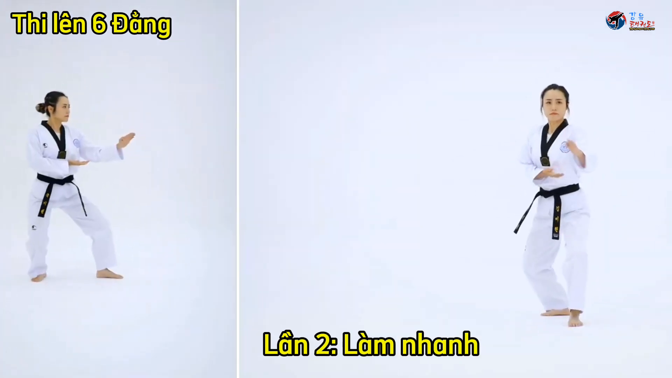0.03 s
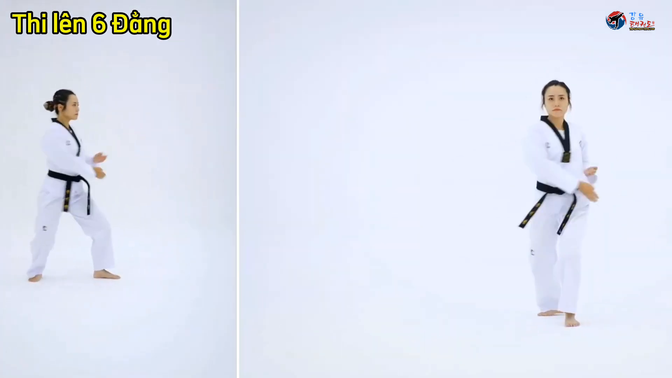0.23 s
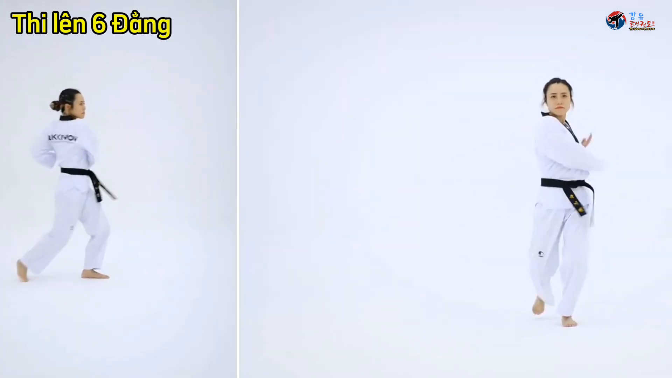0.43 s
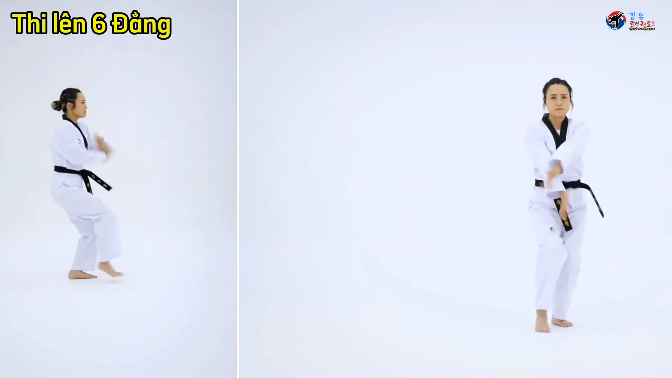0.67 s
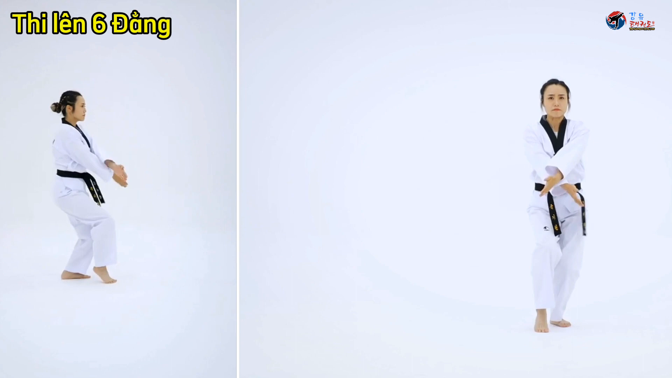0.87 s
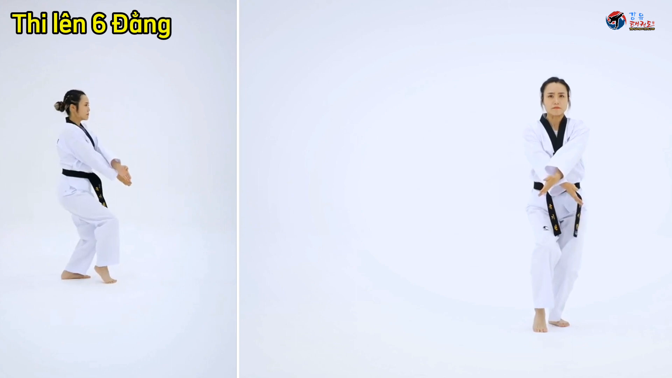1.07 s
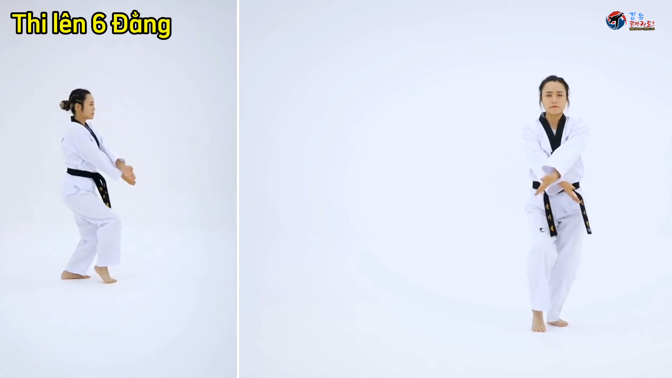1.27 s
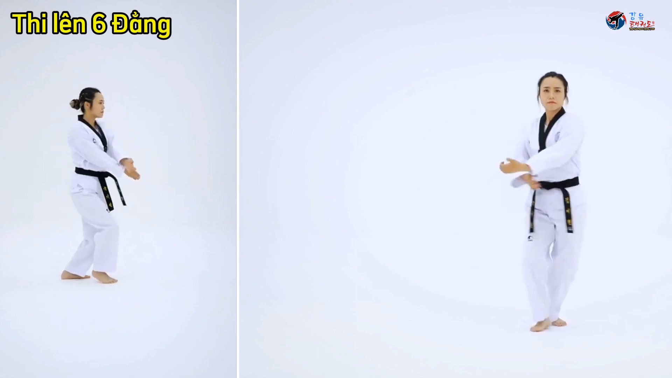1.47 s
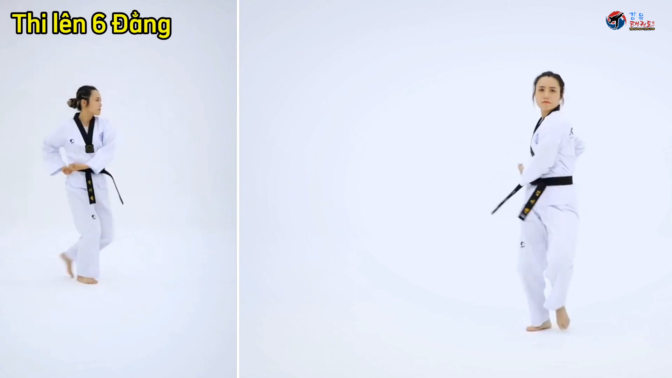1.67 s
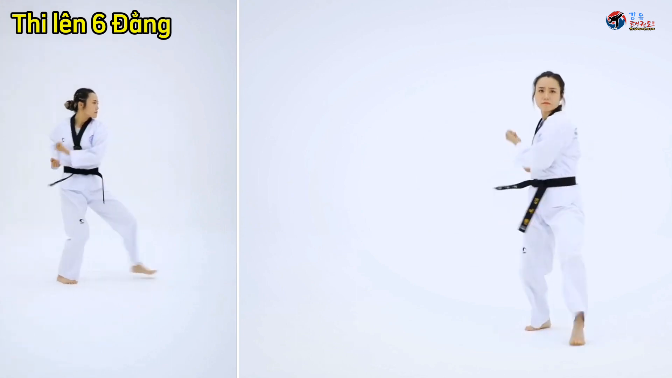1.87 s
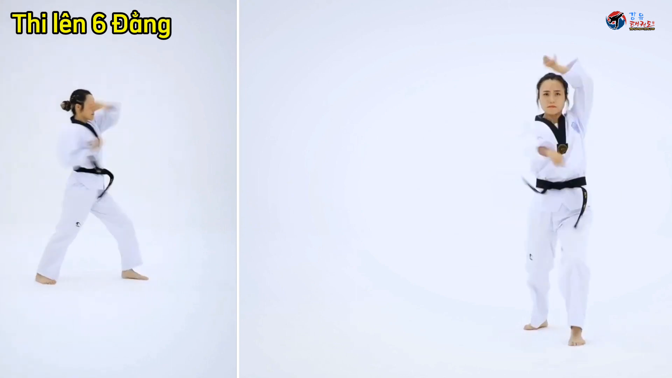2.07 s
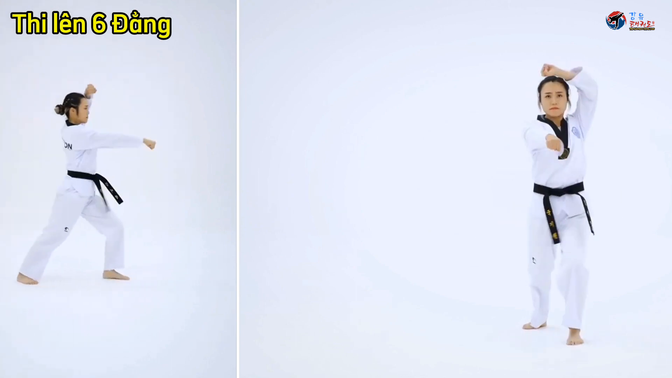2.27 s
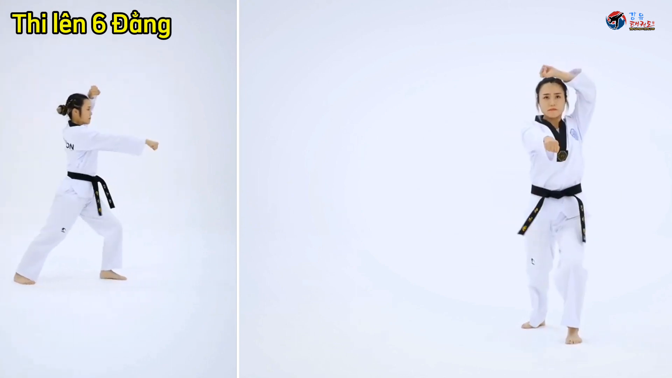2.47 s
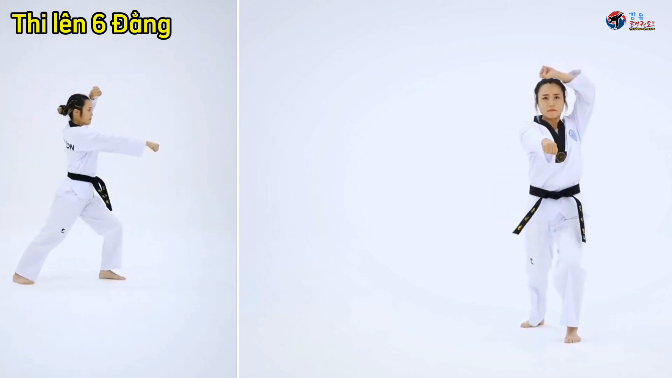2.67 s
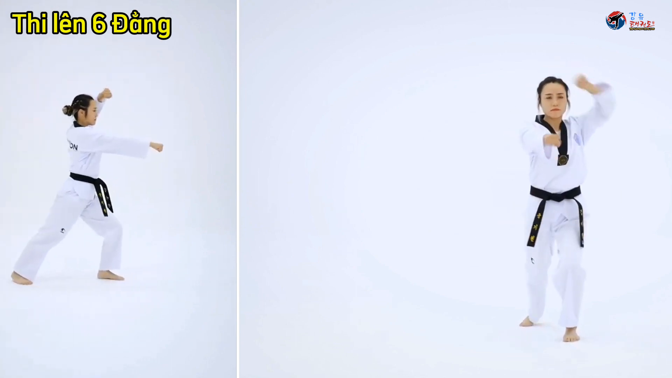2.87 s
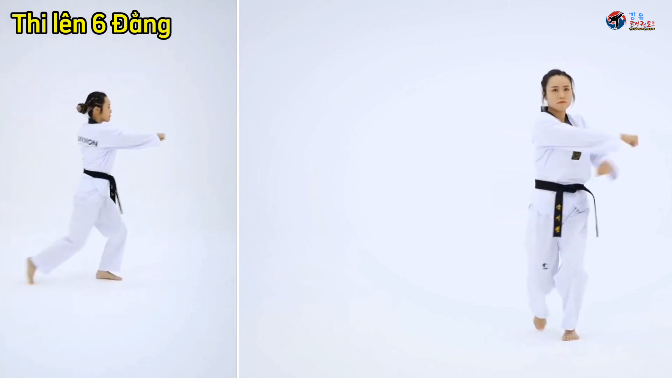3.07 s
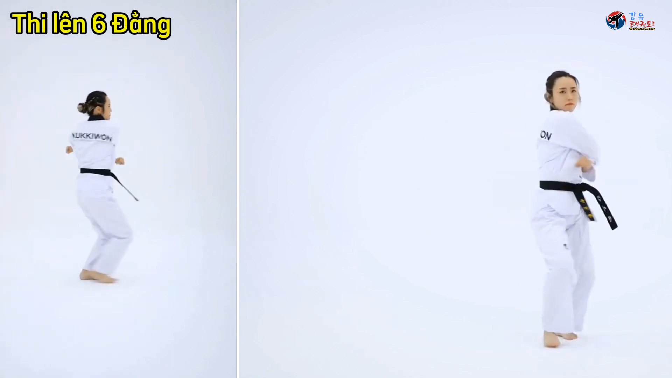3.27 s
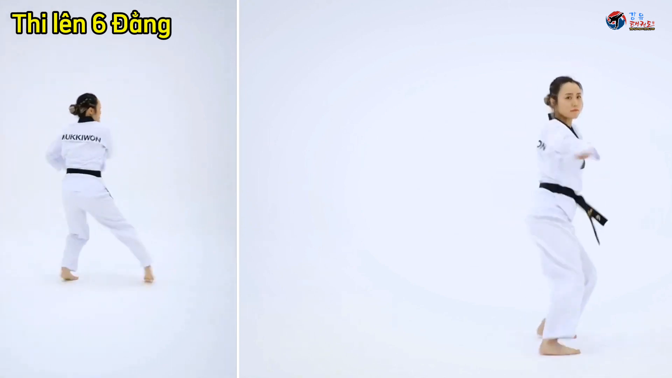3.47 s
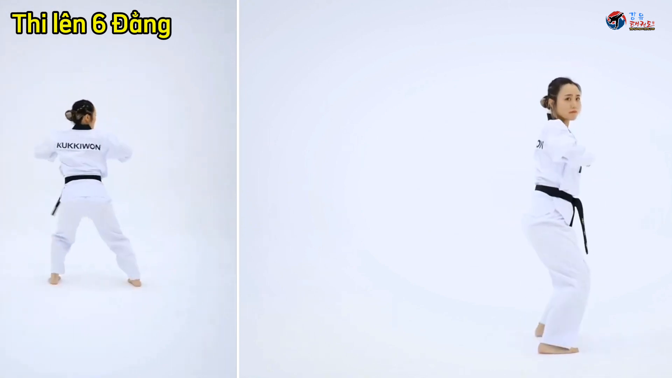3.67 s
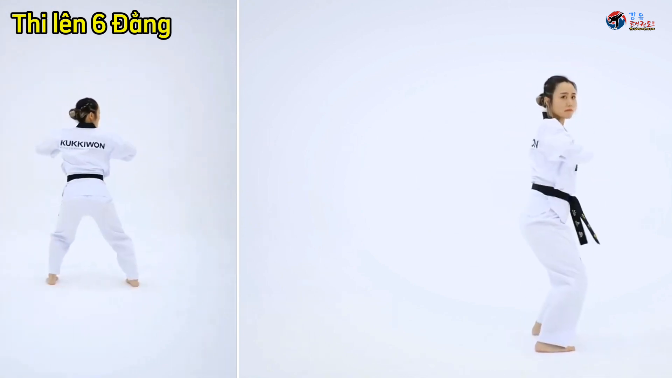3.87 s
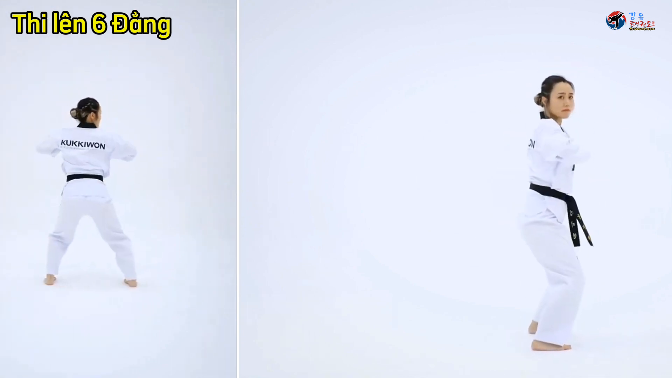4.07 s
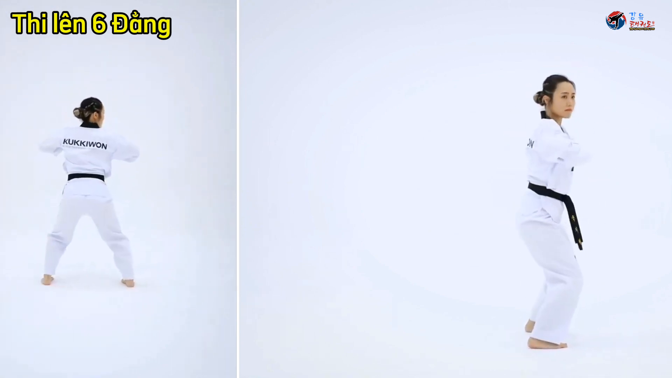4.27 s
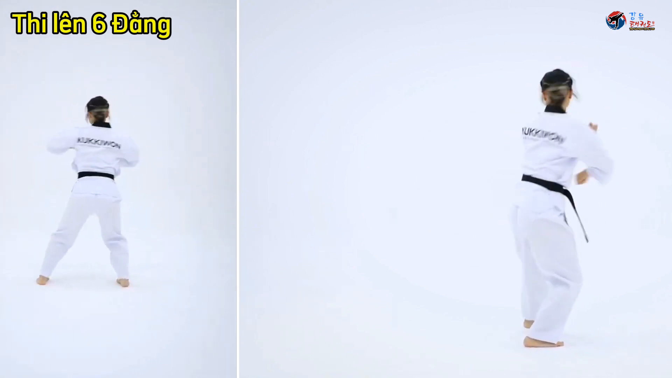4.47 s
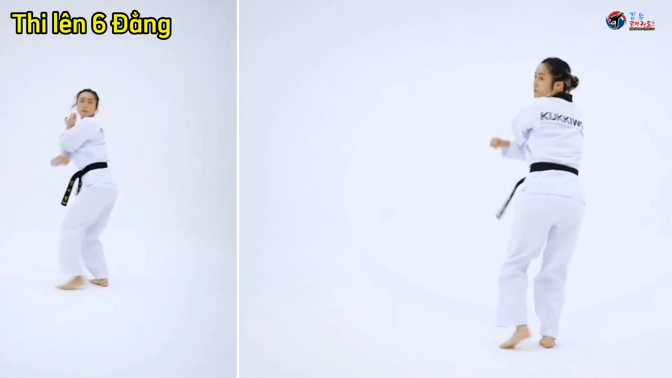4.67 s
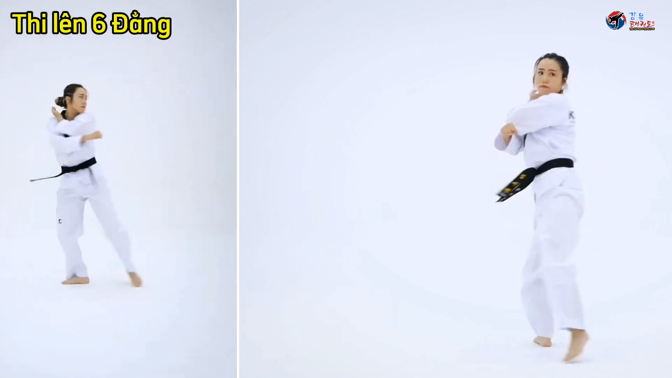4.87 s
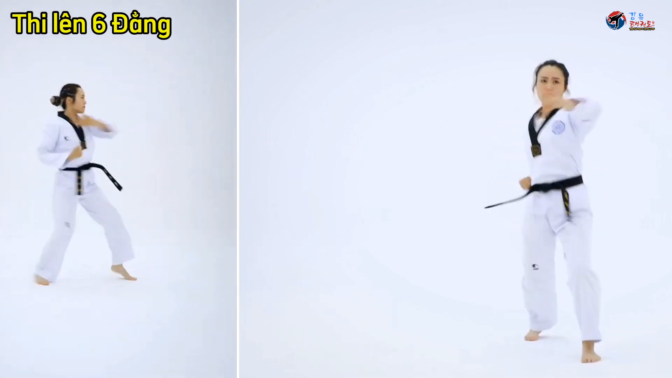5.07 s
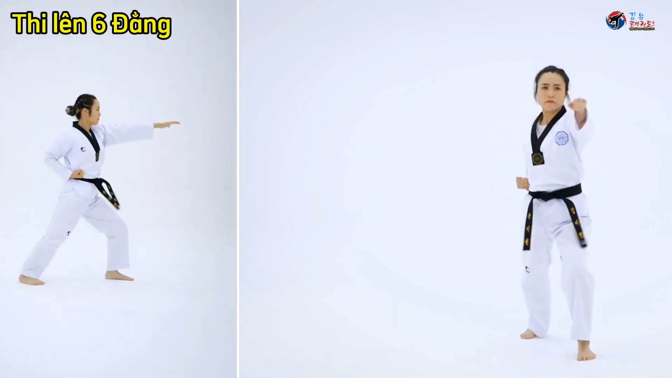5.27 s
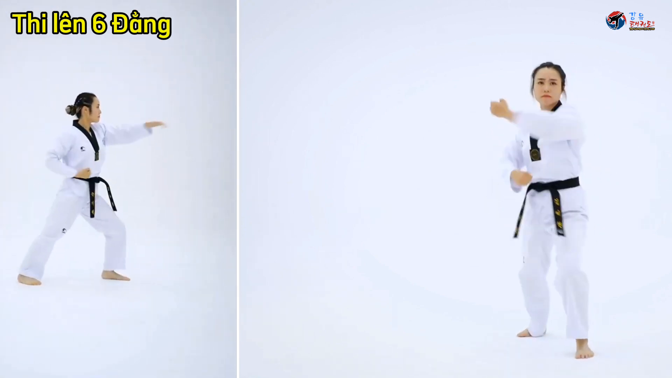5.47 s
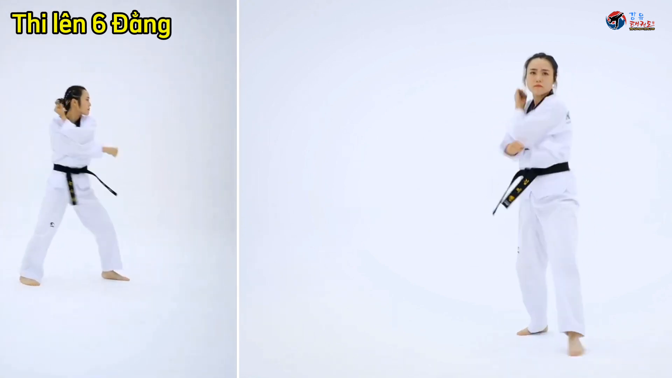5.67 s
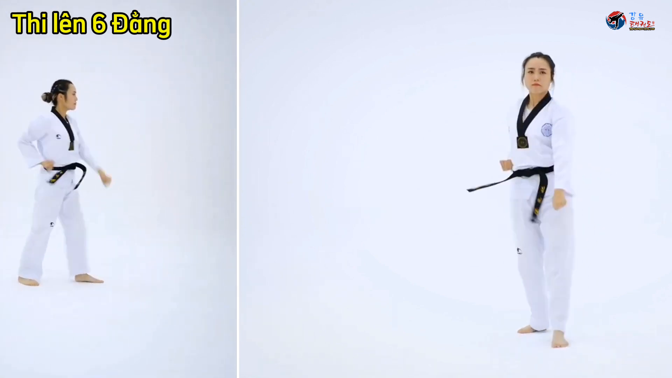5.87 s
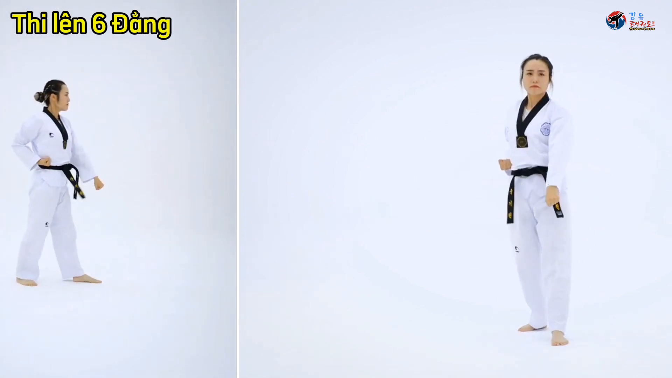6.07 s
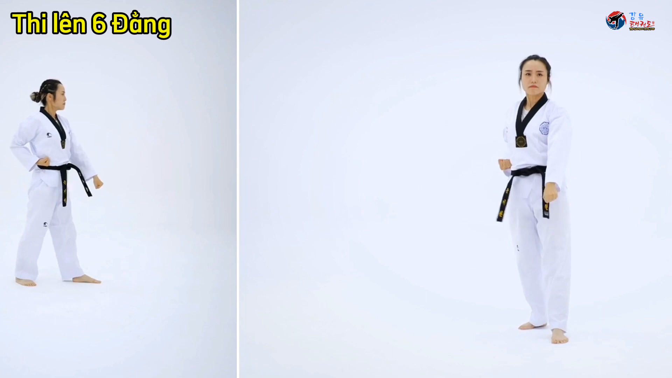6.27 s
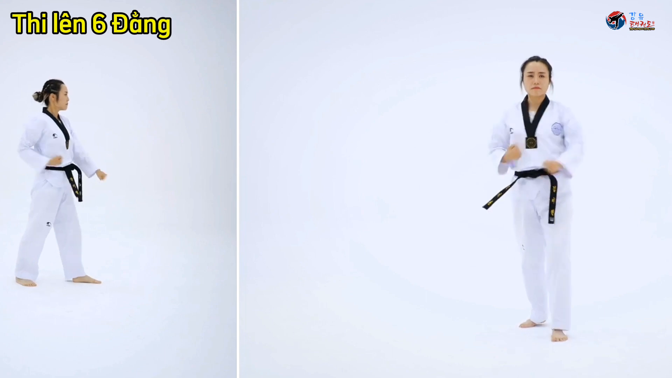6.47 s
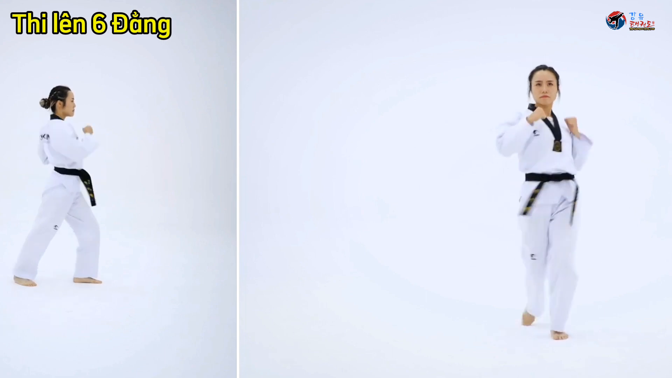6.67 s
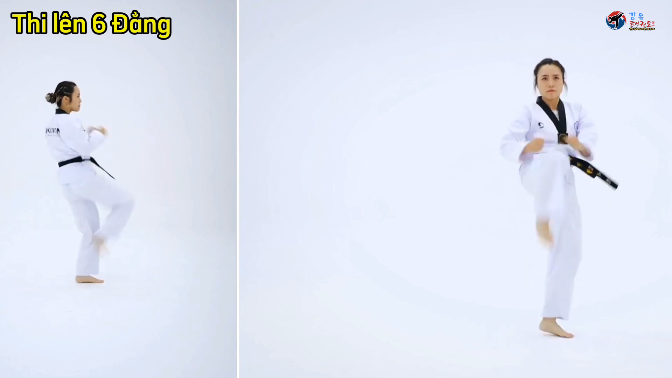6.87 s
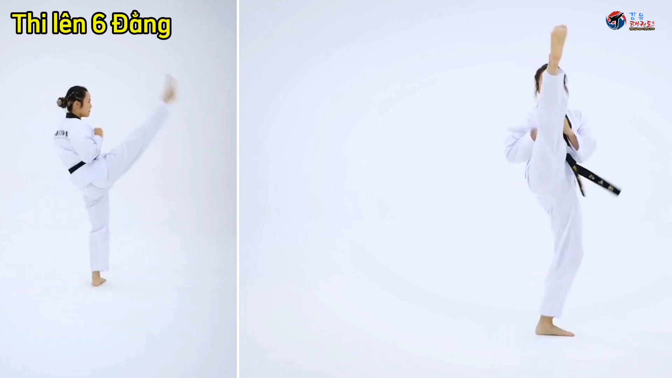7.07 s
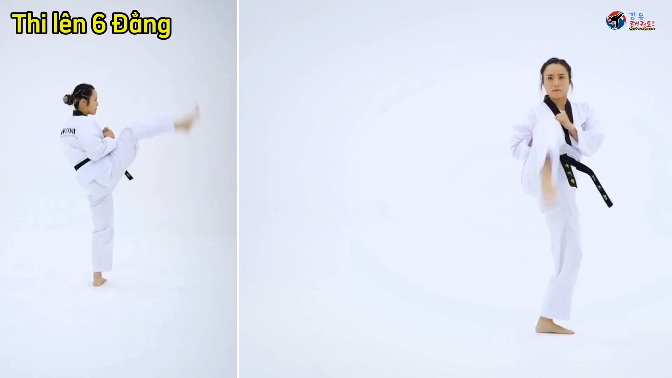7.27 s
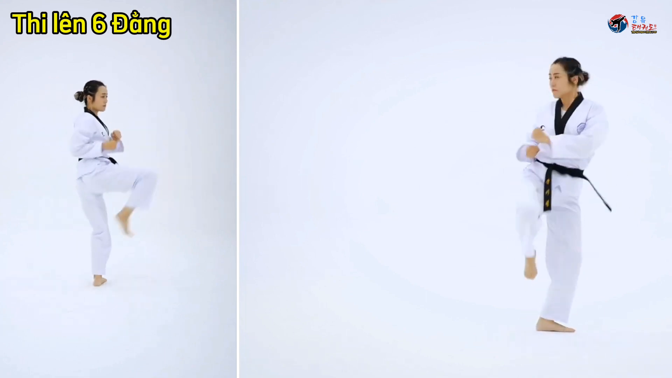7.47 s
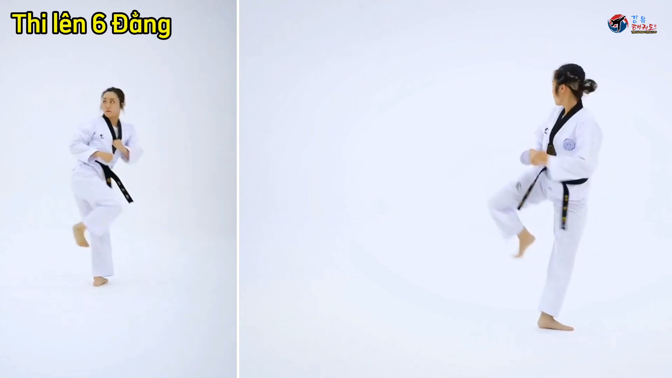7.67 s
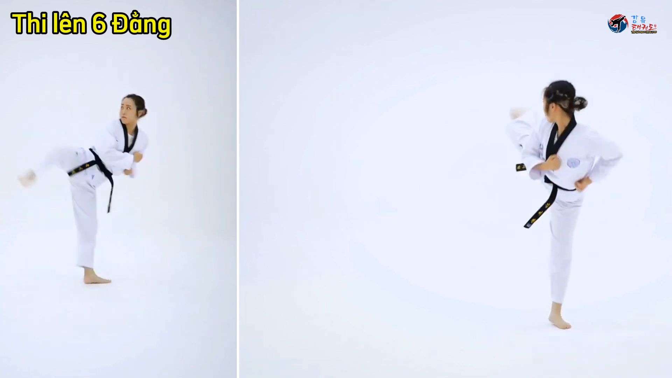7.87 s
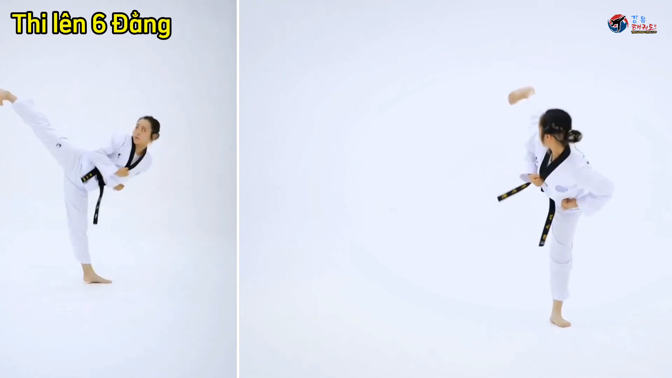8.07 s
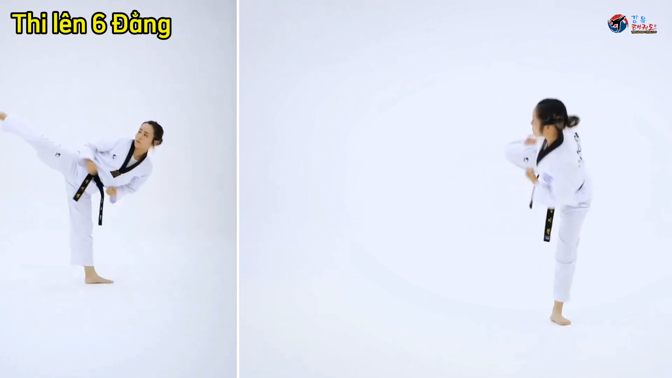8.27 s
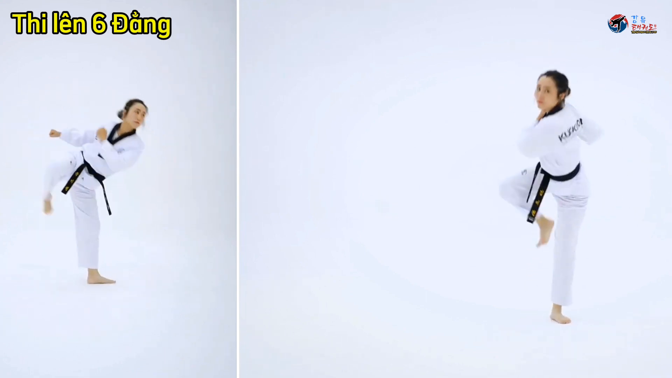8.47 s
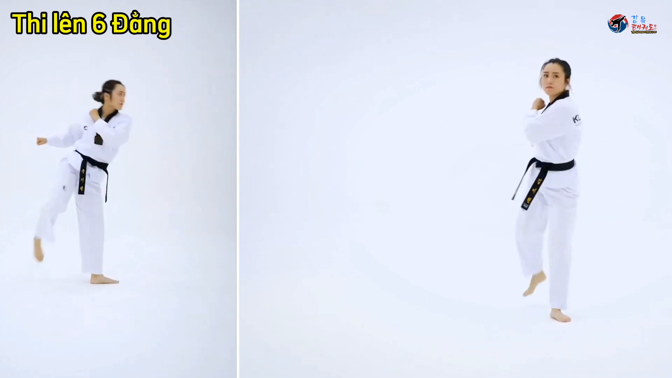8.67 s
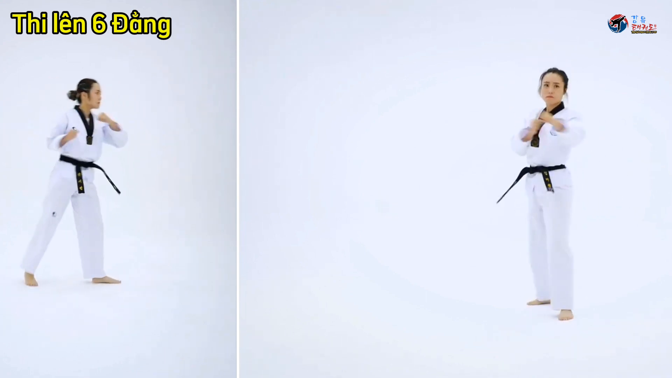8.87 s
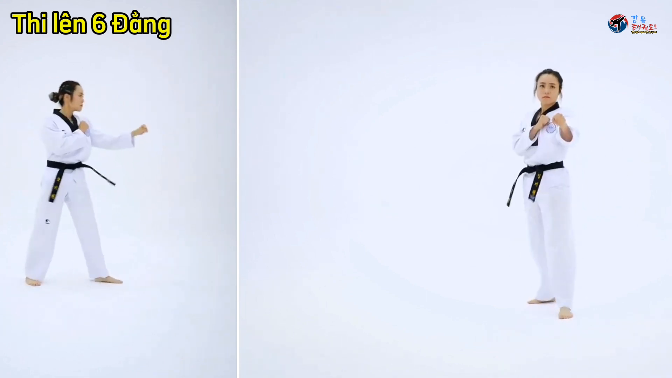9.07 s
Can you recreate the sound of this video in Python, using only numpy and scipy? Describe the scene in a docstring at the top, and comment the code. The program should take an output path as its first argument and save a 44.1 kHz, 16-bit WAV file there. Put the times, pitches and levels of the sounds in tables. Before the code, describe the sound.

Faint, wide hall air runs throughout, slightly stronger on the right. At 0.4 s a close hiss with low hum cuts in, and at 0.6 s a cotton sleeve swishes and snaps hard. A soft foot slide follows around 1.6 s. Near 2.1 s several pops cluster in a billowing whoosh, then a light step; the hiss drops out at 2.5 and returns at 2.9. A fluttering double snap comes at 3.3 s, hiss closing at 3.5, then faint scuffing. A step and slide at 4.7 s lead to crackling snaps at 5.4, a faint heel thud at 5.7 and a crisp crack at 6.15. Feet rub; a softer fluttering kick passes at 7.1. The heaviest, deepest cloth crack bursts at 7.9, another light flapping snap at 8.9, each with a short close echo and faint hall wash. The hiss shuts at 9.2 s, leaving quiet air.

```python
"""A martial artist in a loose cotton uniform throws eight fast blocks, punches and kicks in a hall.
Quiet air of the hall lies under everything; a close hiss and hum cut in first, then in and out around the strokes.
From 0.6 s to 8.9 s each stroke drags cloth through the air (turbulent noise following speed), sometimes flaps it
like a flag, and pulls it taut in pops (air pushed and sucked back) and cracks (coloured clicks); a faint wide wash
follows the cloth. From 1.6 s bare feet scuff, slide and step (friction noise), and ring in the hall."""
import sys
import numpy as np
from scipy import signal
from scipy.fft import rfft, irfft
from scipy.io import wavfile

SR = 44100
rng = np.random.default_rng(int(sys.argv[2]) if len(sys.argv) > 2 else 0)


def inscribe(sig):
    """Save sig as 16-bit PCM at rate SR to the path in sys.argv[1].

    A 1-D sig is mono; a 2-D sig holds one channel per row.
    Samples are clipped to [-1, 1] before scaling.
    """
    pcm = np.round(np.clip(np.atleast_2d(sig).T, -1, 1) * 32767)
    wavfile.write(sys.argv[1], SR, pcm.astype(np.int16))


N = 402633
TIME = np.arange(N) / SR  # s

# strokes of arm or leg, with the drive of each cloth noise:
# (time of top speed [s], run-up [s], swish [dB], billow [dB], weave hiss [dB])
STROKES = [(0.633, 0.082, -16, -29, -40), (2.074, 0.078, -15.5, -18.5, -38),
           (3.282, 0.098, -18, -26.5, -37), (5.41, .1, -15, -21, -37), (6.148, 0.062, -17, -23, -39),
           (7.111, 0.12, -21.5, -24, -41), (7.910, 0.086, -17.5, -14.5, -38),
           (8.858, 0.11, -21.5, -23.5, -42)]
# spectrum of air torn by cloth: (frequency [Hz], level [dB])
SWISH = [(40, -12.5), (100, 1.5), (190, 2.5), (300, -1.5), (450, 1), (680, -6), (950, -9.5), (1500, -21.5),
         (2500, -25.5), (4200, -31.5), (7500, -47), (9000, -73)]
# spectrum of the billowing sleeve: (frequency [Hz], level [dB])
BILLOW = [(15, -17), (35, -12), (60, -2), (110, -6), (200, -12), (500, -41), (1500, -62)]
# spectrum of threads rubbing, and of the close hiss: (frequency [Hz], level [dB])
WEAVE = [(2000, -3), (4000, -6), (6500, -15), (8100, -22), (9000, -7.5), (9900, 0.5), (11500, 2.5),
         (13000, -2.5), (16000, -8.5)]
# spectrum of cloth slapping and creasing: (frequency [Hz], level [dB])
SLAP = [(150, 4), (500, -5.5), (900, 9), (1700, -2.5), (3000, -14.5), (5000, -21), (7800, -30.5),
        (10000, -44), (16000, -39)]
RISE_SHARE, BRAKE_S = 0.56, 0.068  # speed rises over this share of the run-up and dies away in this time
CRACKLE_DB, RUB_DB = -16.5, -6.5  # creases against the swish drive; first rub against its square


def strokes():
    """Aerodynamic and frictional noise: cloth speed drives swish, crackle and billow; the weave rubs."""
    swish, billow, crackle, weave = np.zeros((4, N))
    for s, run_up, swish_db, billow_db, weave_db in STROKES:
        force = undb(swish_db)
        moving = between(s - run_up, N / SR + 1, 0.023)  # stays open; the speed swell ends the stroke
        speed = swell(s, RISE_SHARE * run_up, BRAKE_S)
        swish += force * speed * (0.19 + 0.49 * moving)
        billow += undb(billow_db) * speed ** 1.17
        crackle += undb(CRACKLE_DB) * force * speed * moving
        weave += undb(weave_db) * swell(s, 0.11, 0.082) * (0.26 + 0.53 * moving)
        # first rub as the limb sets off
        weave += undb(RUB_DB) * force ** 2 * swell(s - run_up + 0.015, 0.019, 0.012)
    flutter = unit(colour(grains(2600, 3.9), SWISH))
    creases = unit(colour(grains(900, 6.1), SLAP))
    threads = unit(colour(grains(6000, 2.3), WEAVE))
    return swish * flutter + crackle * creases + billow * noise(BILLOW) + weave * threads


# loose cloth flapping: (start [s], end [s], mean flap rate [Hz], drive towards the end [dB])
FLAPPING = [(3.2, 3.238, 52, -19.5), (7.042, 7.107, 121, -14.5), (7.906, 7.938, 47.7, -7.5),
            (8.790, 8.853, 122, -15.5)]


def flapping(uneven=0.23, overtone=0.68, slap_db=-9):
    """Flag flutter: unevenly spaced ripples run down the cloth, grow with speed and slap at each crest."""
    out = np.zeros(N)
    wander = noise([(60, 2.5), (150, -27), (400, -54)])
    slap = noise(SLAP)
    for start, end, hz, db in FLAPPING:
        rate = hz * (1 + uneven * wander) * (TIME > start)
        phase = 2 * np.pi * np.cumsum(rate) / SR
        size = undb(db) * between(start, end, 0.0016) * swell(end, 0.052, 0.01)
        ripple = np.sin(phase) + overtone * np.sin(2 * phase)
        crest = np.exp(4 * (np.cos(phase) - 1))
        out += size * (ripple + undb(slap_db) * crest * slap)
    return out


# panels of cloth snapping taut, wide panels low: (time [s], peak of the push [dB], pitch [Hz])
SNAPS = [(0.632, -6, 273), (2.032, -14, 490), (2.059, -6, 229), (2.094, -11.5, 160), (3.249, -11, 103),
         (3.2652, -10, 450), (5.379, -13, 300), (5.394, -5, 221), (6.146, -3, 198), (7.113, -10.5, 530),
         (7.8971, 1, 250), (7.983, -12.5, 161), (8.8612, -12, 525)]
# heels thudding down: (time [s], peak of the push [dB])
HEELS = [(5.716, -29), (6.324, -27.5)]
HEEL_HZ = 59
# the wider cloth around a snap follows it, lower and weaker: delay [s], pitch ratio, level [dB]
SLEEVE_LAG_S, SLEEVE_PITCH, SLEEVE_DB = 0.0029, 0.34, -6
# then the panel swings back once: delay [s], pitch ratio, level [dB]
REBOUND_S, REBOUND_PITCH, REBOUND_DB = 0.01006, 0.77, -5


def pops():
    """Impulsive volume displacement: a taut panel or a heel pushes air; a panel drags its sleeve and rebounds."""
    sleeves = [(s + SLEEVE_LAG_S, db + SLEEVE_DB, hz * SLEEVE_PITCH) for s, db, hz in SNAPS]
    rebounds = [(s + REBOUND_S, db + REBOUND_DB, hz * REBOUND_PITCH) for s, db, hz in SNAPS]
    thuds = [(s, db, HEEL_HZ) for s, db in HEELS]
    push, strain = np.zeros((2, N))
    for s, db, hz in SNAPS + sleeves + rebounds + thuds:
        near = abs(TIME - s) < 1 / hz
        u = 2 * np.pi * hz * (TIME[near] - s)
        push[near] -= undb(db) * u * np.exp((1 - u ** 2) / 2)  # slope of a bell curve, peak 1
        strain[near] += undb(db) * np.exp(-(u / 1.8) ** 2)
    crackle = unit(colour(grains(3600, 2.6), SWISH))
    return push + undb(-13.5) * strain * crackle


# hems cracking on their own: (time [s], drive of the bright tick [dB], drive of the mid slap [dB])
CRACKS = [(0.5508, -11, -27), (0.6086, -26, -7.5), (2.011, -25, -24), (3.2508, -18, -15), (3.285, -27, -6),
          (3.322, -24, -10.5), (5.3285, -15, -16), (5.402, -14.5, -13), (6.1419, -10, -3),
          (7.084, -27, -12), (7.862, -20, -7.5), (7.91, -18, -8.5), (7.934, -18, -14), (8.832, -29, -13)]
# spectrum of a hem's edge: (frequency [Hz], level [dB])
CRACK = [(200, 10.5), (900, 8), (2000, -15), (4500, -8.5), (7800, -18), (10000, 3.5), (12000, -1),
         (16000, -7)]
# slap drive equals the pop's level at this pitch; smaller, higher panels slap more
SLAP_HZ, SLAP_DB_PER_OCTAVE = 410, 13
TICK_DB = -17  # drive of a snapping panel's tick against its slap drive


def cracks():
    """Whip-like transients: a hem, alone or with a snap, gives a bright edge tick and a frayed cloth slap."""
    ticks, slaps = np.zeros((2, N))
    for s, db, hz in SNAPS:
        slaps[int(s * SR)] += undb(db + SLAP_DB_PER_OCTAVE * np.log2(hz / SLAP_HZ))
    ticks += undb(TICK_DB) * slaps
    for s, tick_db, slap_db in CRACKS:
        ticks[int(s * SR)] += undb(tick_db)
        slaps[int(s * SR)] += undb(slap_db)
    return burst(ticks, 0.0027, -14.5, CRACK) + undb(-7.0) * burst(slaps, 0.0026, -16.0, SLAP)


# spectrum of the short echo's source: (frequency [Hz], level [dB])
ECHO = [(40, -5.5), (120, -15.5), (240, -5), (450, -1.5), (750, -4), (2000, 1), (6000, 1), (12000, 1)]
# decay of the short echo: (frequency [Hz], reverberation time T60 [s])
NEAR_T60 = [(60, 0.4), (200, 0.42), (600, 0.61), (2000, 0.84), (5000, 0.75), (12000, 0.39)]


def short_echo(cloth):
    """Diffuse reverberation close around the strokes, in the centre."""
    return undb(-9.0) * reverb(colour(cloth, ECHO), NEAR_T60, 0.036)


# soles touching the floor: (time [s], drive [dB], fall [s])
STEPS = [(2.352, -38.5, 0.0075), (3.621, -40.5, 0.0097), (4.702, -44, 0.038)]
# feet turning on the floor: (time [s], drive [dB], rise [s])
SCUFFS = [(1.76, -56, 0.19), (2.42, -55, 0.16), (3.67, -49, 0.24), (4.86, -53.5, 0.07), (5.15, -53, 0.084),
          (5.90, -48.5, 0.1), (6.875, -49, 0.078), (7.59, -53.5, 0.12), (8.39, -58, 0.12)]
# spectrum of skin rubbing the floor: (frequency [Hz], level [dB])
SCUFF = [(100, -14), (350, 3), (1000, -3.5), (2000, -1.5), (3500, -6.5), (6000, -15.5), (9000, -21.5),
         (16000, -25)]
# soles planting, squeaking and sliding with a pitch:
# (time [s], drive [dB], rise [s], fall [s], pitch [Hz], width [Hz])
SLIDES = [(1.62, -49, 0.11, 0.2, 204, 80), (4.702, -37.5, 0.0027, 0.024, 180, 350),
          (4.790, -45.5, 0.07, 0.041, 630, 339), (6.78, -51.5, 0.07, 0.097, 940, 300),
          (8.53, -52, .10, 0.058, 940, 300)]
TOUCH_S = 0.0018  # rise of a step
SCUFF_FALL = 0.57  # a turn dies away in this share of its rise


def feet():
    """Friction: bare soles rub broadly; where the skin sticks and slips the noise narrows to a pitch."""
    pressure, pitched = np.zeros((2, N))
    for s, db, fall in STEPS:
        pressure += undb(db) * swell(s, TOUCH_S, fall)
    for s, db, rise in SCUFFS:
        pressure += undb(db) * swell(s, rise, SCUFF_FALL * rise)
    for s, db, rise, fall, hz, width_hz in SLIDES:
        pitched += undb(db) * swell(s, rise, fall) * resonance(hz, width_hz)
    return pressure * unit(colour(grains(5000, 6.0), SCUFF)) + pitched


# stretches in which the close sound and its hiss are open: (start [s], end [s])
HISS = [(0.421, 2.474), (2.882, 3.5), (4.688, 6.418), (6.644, 7.445), (7.516, 9.2)]
# spectrum of the rumble under the hiss: (frequency [Hz], level [dB])
RUMBLE = [(20, -6.5), (45, 4), (110, -2.5), (190, 0.5), (320, -3.5), (500, -4.5), (750, -8), (980, -9.5),
          (1500, -10.5), (4000, -25), (8000, -50.5)]
# soft hum in the hiss: (time [s], mean frequency [Hz], level [dB])
HUM = [(0.45, 159, -50), (2.4, 157, -56), (3.0, 170, -62), (6.299, 190, -56), (6.7, 224, -51),
       (9.1, 221, -52)]
# treble of the hiss: (time [s], level [dB])
HISS_TREBLE = [(0.45, -61), (0.94, -68), (1.444, -67), (1.47, -56), (3.3, -57), (4.8, -53), (6.7, -57.5),
               (9.1, -58)]
RUMBLE_DB = -47.5


def close_hiss(waver=0.036):
    """Gated noise and frequency modulation: rumble, wavering hum and bright hiss cut in and out together."""
    drift = noise([(3, 1.5), (12, -21.0), (40, -91)])
    times, hum_hz, hum_db = np.transpose(HUM)
    rate = np.interp(TIME, times, hum_hz) * (1 + waver * drift)
    phase = 2 * np.pi * np.cumsum(rate) / SR
    hum = undb(np.interp(TIME, times, hum_db)) * unit(np.sin(phase))
    treble = undb(np.interp(TIME, *np.transpose(HISS_TREBLE))) * noise(WEAVE)
    is_open = sum(between(start, end, 0.0061) for start, end in HISS)
    return is_open * (undb(RUMBLE_DB) * noise(RUMBLE) + hum + treble)


# spectrum of the late wash: (frequency [Hz], level [dB])
LATE_WASH = [(100, -27), (300, -7), (700, -3), (1500, -5.5), (3000, 3), (6000, 3.5), (9000, -15),
             (16000, -36)]
# decay of the wide reverberation: (frequency [Hz], reverberation time T60 [s])
HALL_T60 = [(200, 0.55), (1500, 1.42), (4000, 1.74), (12000, 0.25)]


def wide_reverberation(cloth, steps):
    """Reverberation: a faint wide wash swells up 125 ms after the cloth; the feet ring at once."""
    late = np.interp(TIME - 0.125, TIME, colour(cloth, LATE_WASH), left=0)
    source = undb(-25.5) * late + undb(-1.5) * steps
    return widen(reverb(source, HALL_T60, 0.0081), reverb(source, HALL_T60, 0.01))


# spectrum of the still air of the hall: (frequency [Hz], level [dB])
AIR = [(20, -66), (45, -25), (90, -11.5), (175, 1), (250, -1), (315, -4.5), (520, -0.5), (700, -6),
       (930, -3), (1600, -8.5), (3200, -18.5), (5000, -27.5), (8500, -36.5), (15500, -40.5)]
AIR_DB = -52.5  # mid signal, before the lean to the right


def hall_air():
    """Stationary diffuse noise: the quiet air of the hall, spread wide."""
    return undb(AIR_DB) * widen(noise(AIR), noise(AIR))


# side against mid in the wide sound: (frequency [Hz], level [dB])
WIDTH = [(60, -26), (110, -49), (200, -33), (380, -13), (700, -9.5), (1290, -4), (2400, 1), (15000, -0.5)]


def widen(mid, side):
    """Interaural coherence of a diffuse field: two ears alike in the bass, unrelated in the treble."""
    return mid + colour(side, WIDTH) * np.array([[1], [-1]])


def reverb(x, t60s, build):
    """Exponential decay: a diffuse tail builds up briefly and dies at its own rate in each octave."""
    t = TIME[:65536]
    white = rfft(rng.standard_normal(len(t)))
    hz = np.fft.rfftfreq(len(t), 1 / SR)
    octave = np.log2(np.clip(hz, 64, 16384))
    tail = 0
    for k in range(6, 15):
        band = irfft(white * np.maximum(1 - abs(octave - k), 0))
        tail = tail + band * np.exp(-np.log(1000) * t / read(t60s, 2 ** k))
    tail = tail * (1 - np.exp(-(t / build) ** 2))
    return signal.fftconvolve(x, tail / np.sqrt(np.sum(tail ** 2)))[:N]


def burst(sizes, ring, fray_db, points):
    """Impulse response: clicks with a fraying tail, coloured and scaled so a bare click of size 1 peaks at 1."""
    decay = signal.lfilter([1], [1, -np.exp(-1 / (ring * SR))], sizes)
    fray = decay * rng.standard_normal(N)
    peak = np.max(abs(colour(signal.unit_impulse(512), points)))
    return colour(sizes + undb(fray_db) * fray, points) / peak


def undb(db):
    """Logarithmic level: decibels to gain."""
    return 10 ** (np.asarray(db) / 20)


def unit(x):
    """Normalisation: scale to rms 1."""
    return x / np.sqrt(np.mean(x ** 2))


def read(points, hz):
    """Log-frequency interpolation of a (frequency [Hz], value) table."""
    f, value = np.transpose(points)
    return np.interp(np.log(np.maximum(hz, 1)), np.log(f), value)


def colour(x, points):
    """Minimum-phase filtering: a causal filter with the given (frequency [Hz], level [dB]) response."""
    size = 8192
    cepstrum = irfft(np.log(undb(read(points, np.fft.rfftfreq(size, 1 / SR)))))
    cepstrum[1:size // 2] *= 2  # fold the cepstrum onto positive time
    cepstrum[size // 2 + 1:] = 0
    return signal.oaconvolve(x, irfft(np.exp(rfft(cepstrum))))[:len(x)]


def noise(points):
    """Spectral shaping: coloured noise of rms 1."""
    return unit(colour(rng.standard_normal(N), points))


def resonance(hz, width_hz):
    """Resonance: noise passed twice through one narrow peak, rms 1."""
    b, a = signal.iirpeak(hz, hz / width_hz, fs=SR)
    once = signal.lfilter(b, a, rng.standard_normal(N))
    return unit(signal.lfilter(b, a, once))


def grains(per_second, spread_db):
    """Shot noise: random tiny clicks of unequal size, rms 1."""
    levels_db = spread_db * np.minimum(rng.exponential(size=N), 4)
    sizes = undb(levels_db) * rng.choice([-1, 1], N)
    return unit(sizes * (rng.random(N) < per_second / SR))


def swell(s, rise, fall):
    """Exponential envelope: rise to time s and fall after it."""
    return np.exp(-np.minimum(np.maximum((s - TIME) / rise, (TIME - s) / fall), 20))


def between(start, end, edge):
    """Gate: 1 from start to end, with short ramps."""
    return np.clip(np.minimum(TIME - start, end - TIME) / edge + 0.5, 0, 1)


def scene():
    """Direct and reverberant sound: close cloth and echo switch in around the strokes; the wide sound stays."""
    cloth = strokes() + flapping() + pops() + cracks()
    steps = feet()
    switched_in = np.minimum(sum(between(start, end, 0.019) for start, end in HISS), 1)
    close = switched_in * (cloth + short_echo(cloth)) + close_hiss()
    wide = wide_reverberation(cloth, steps) + hall_air()
    lean_db = 0.96  # the wide sound is a little louder on the right
    return close + undb(-0.5) * steps + wide * undb(lean_db * np.array([[-0.5], [0.5]]))


TOP_HZ = 15900


def record(dry):
    """Clipping and band limiting: peaks are held at full scale, then the top is cut steeply."""
    steep_cut = signal.ellip(10, 0.2, 80, TOP_HZ, fs=SR, output="sos")
    return signal.sosfilt(steep_cut, np.clip(dry, -1, 1))


dry = scene()
out = record(dry)
inscribe(out)
```